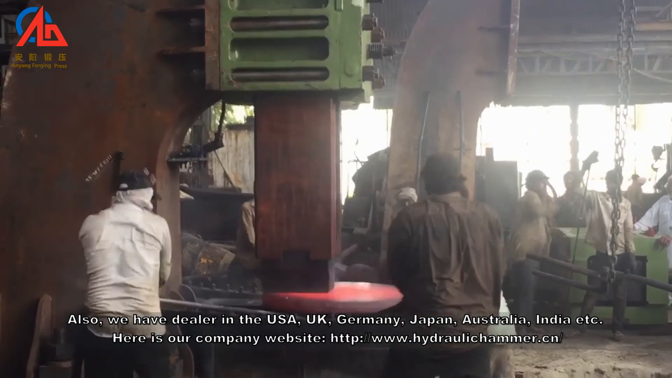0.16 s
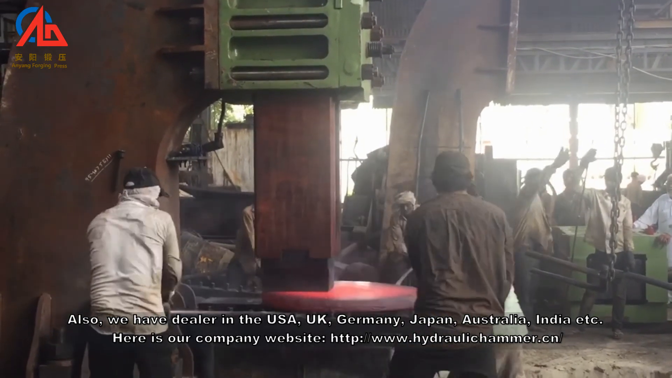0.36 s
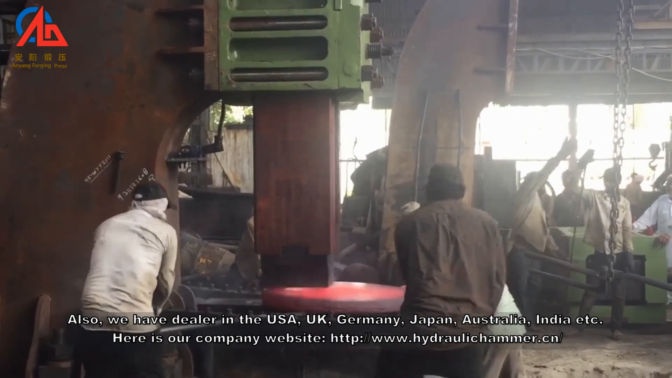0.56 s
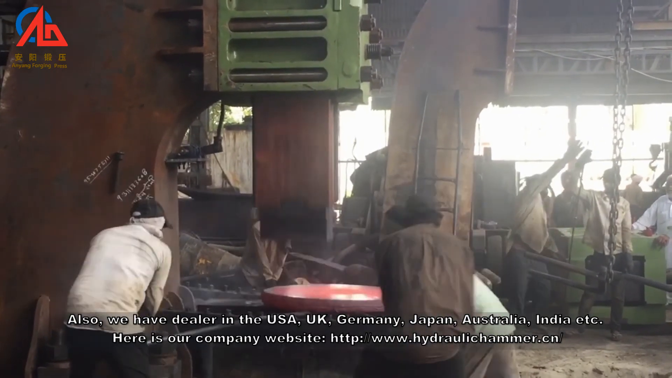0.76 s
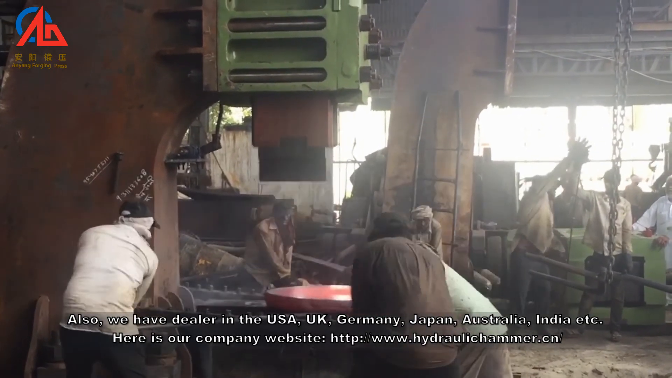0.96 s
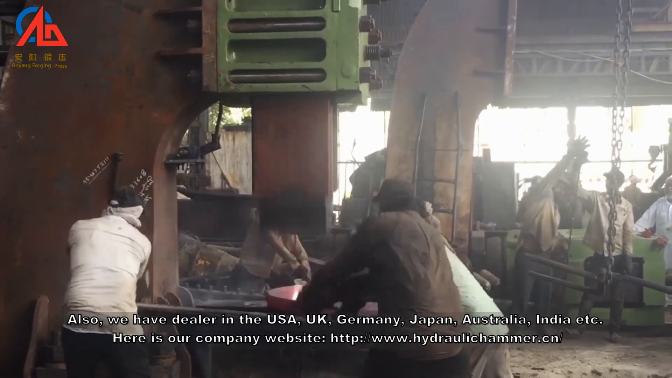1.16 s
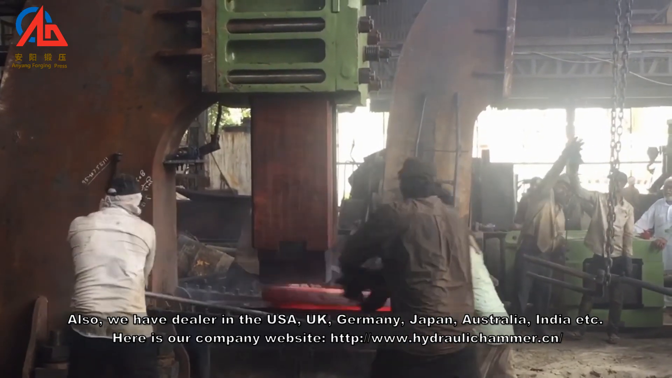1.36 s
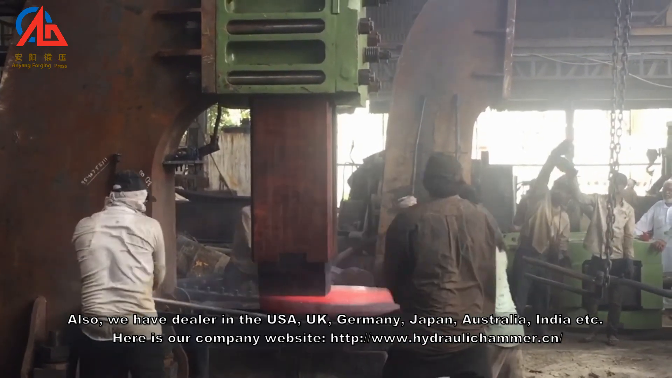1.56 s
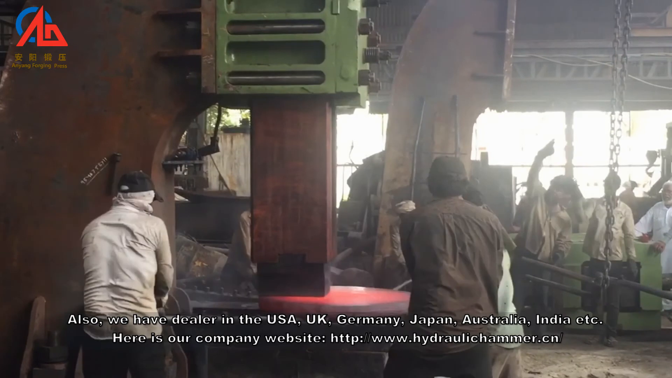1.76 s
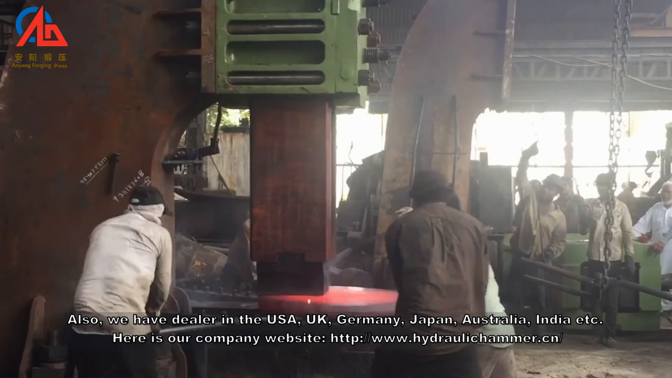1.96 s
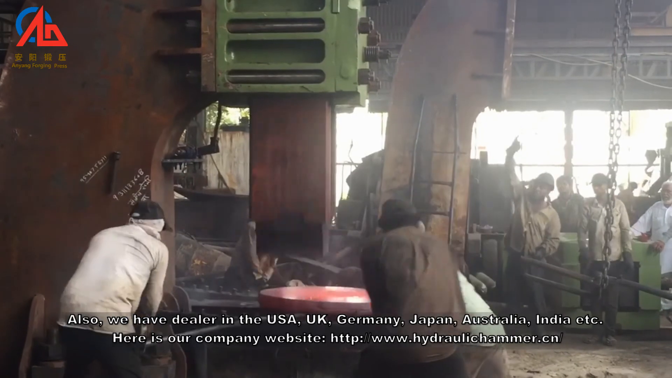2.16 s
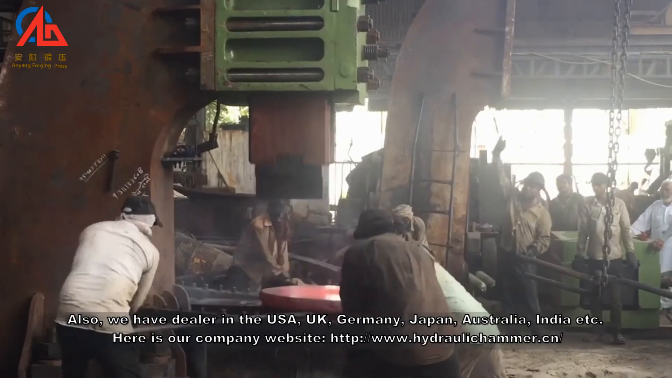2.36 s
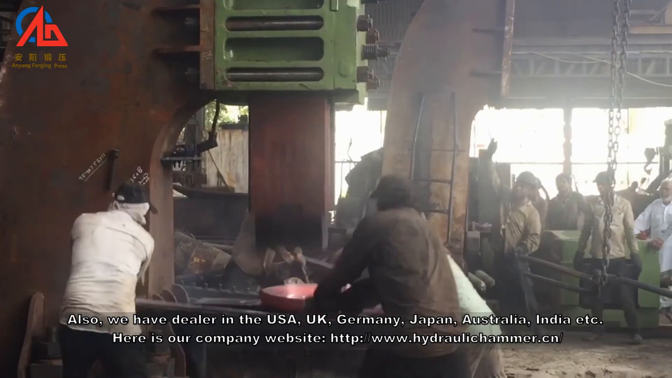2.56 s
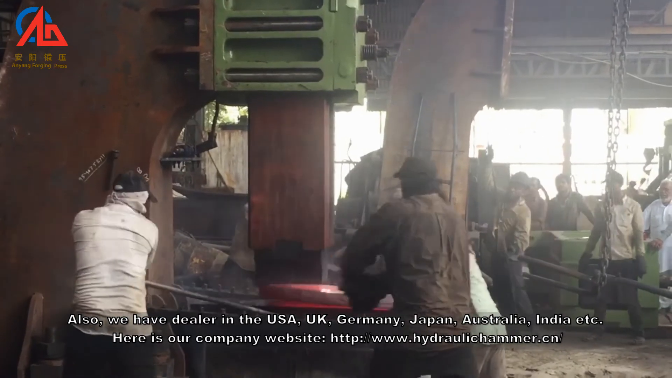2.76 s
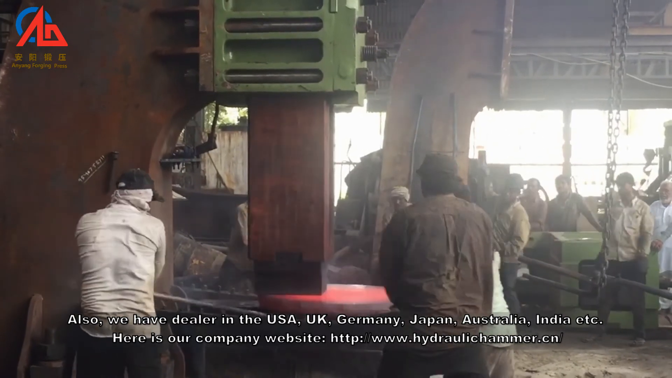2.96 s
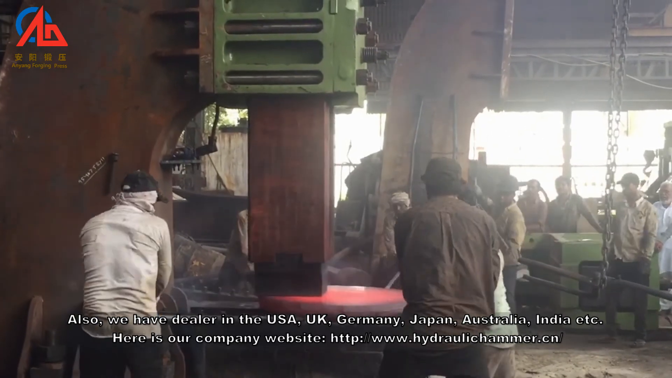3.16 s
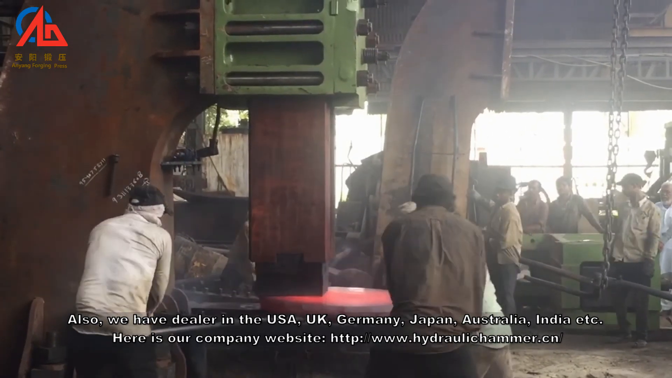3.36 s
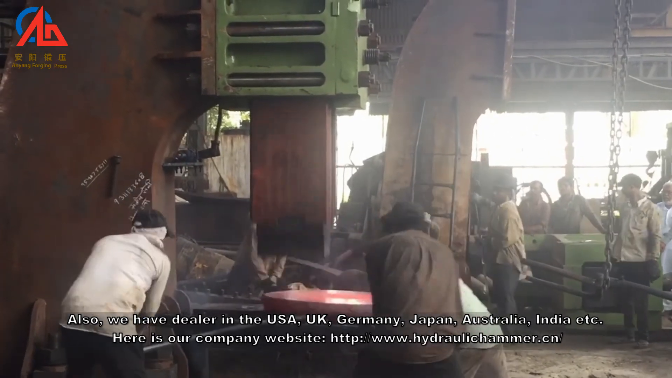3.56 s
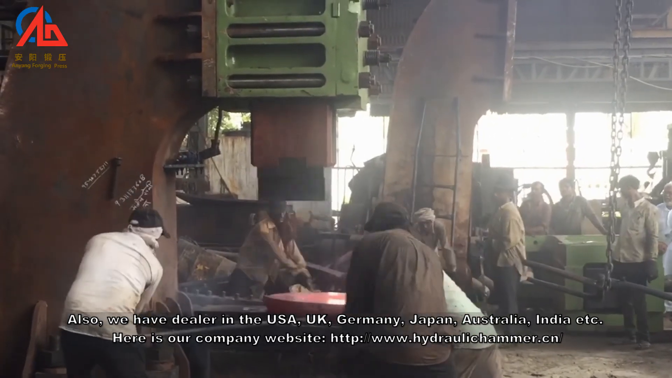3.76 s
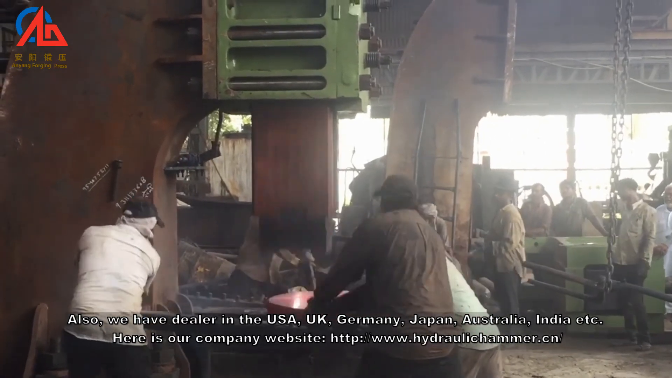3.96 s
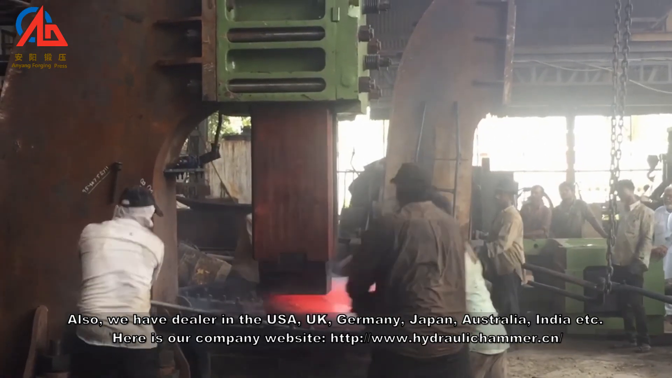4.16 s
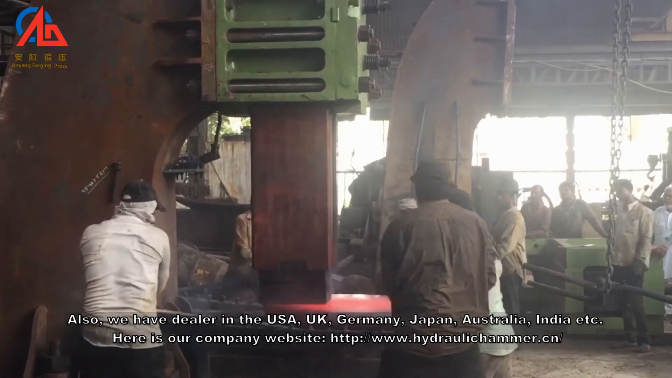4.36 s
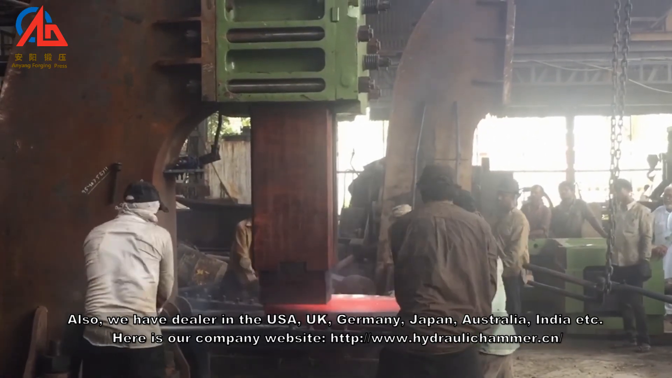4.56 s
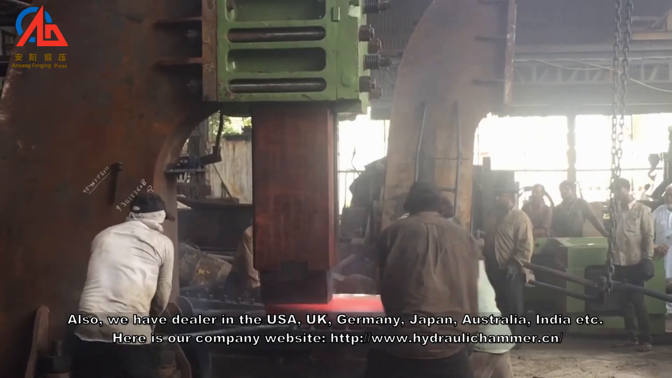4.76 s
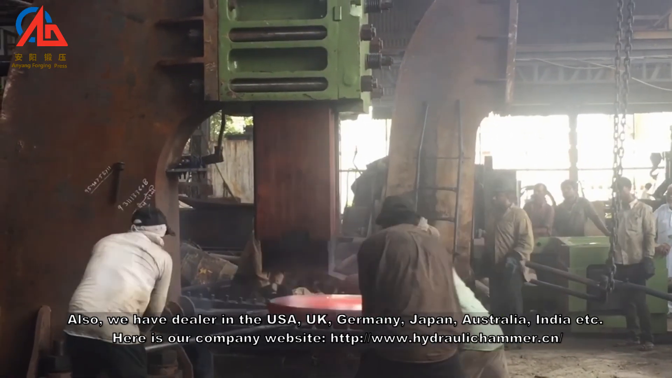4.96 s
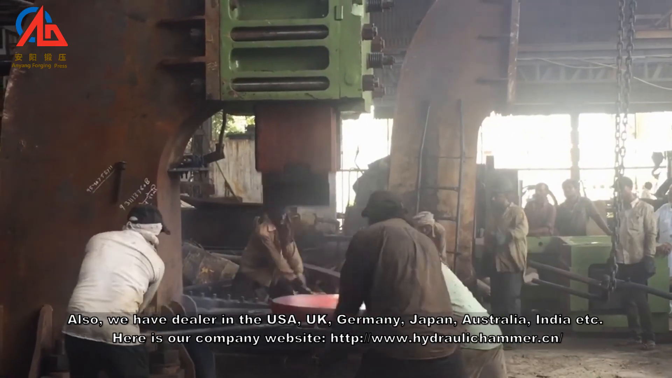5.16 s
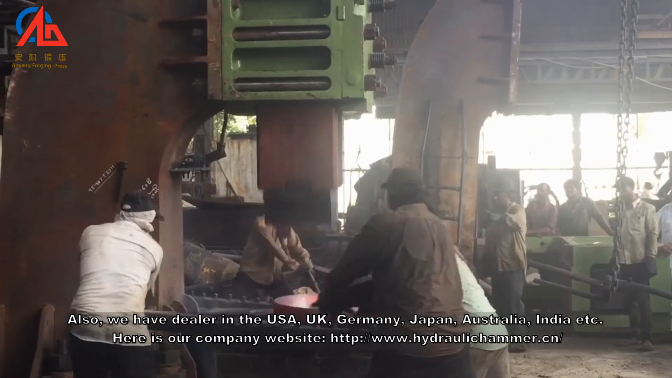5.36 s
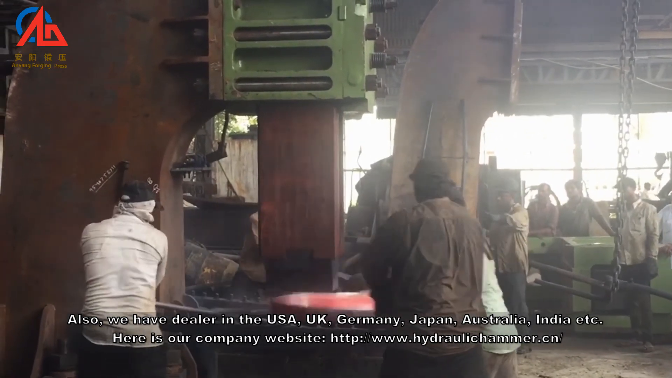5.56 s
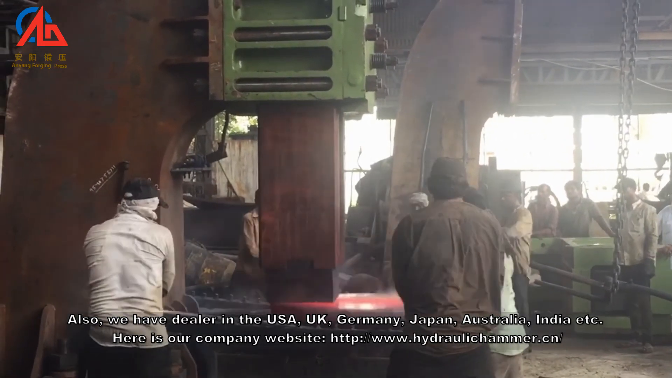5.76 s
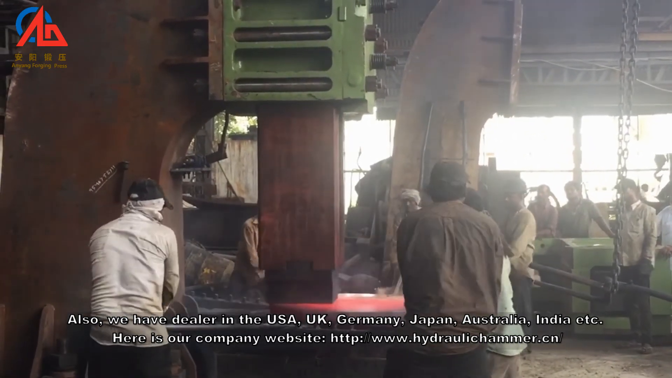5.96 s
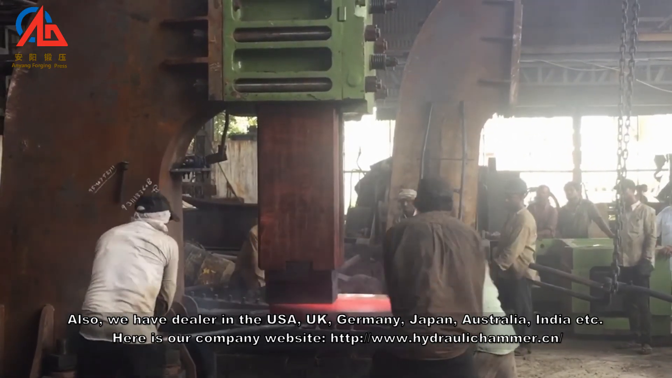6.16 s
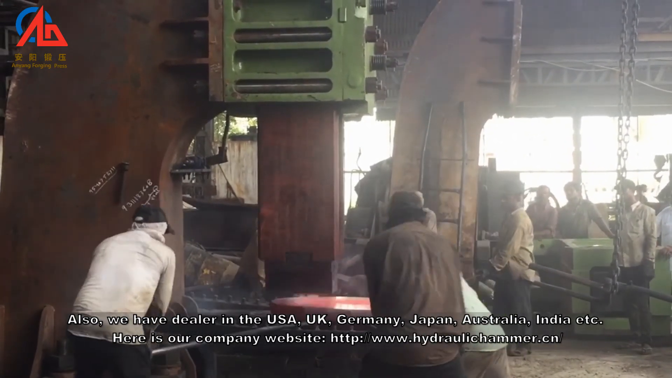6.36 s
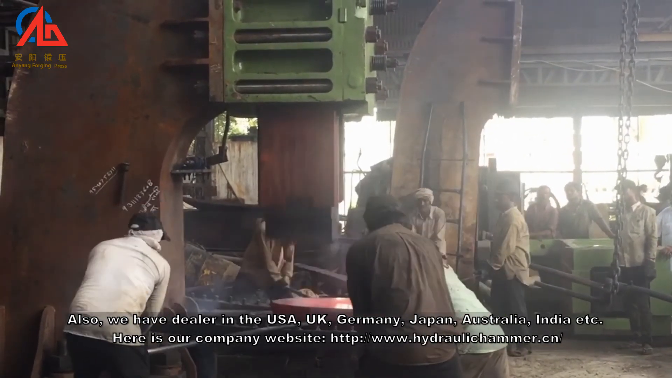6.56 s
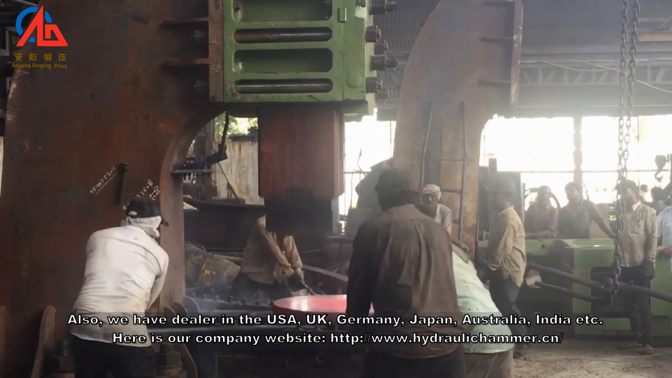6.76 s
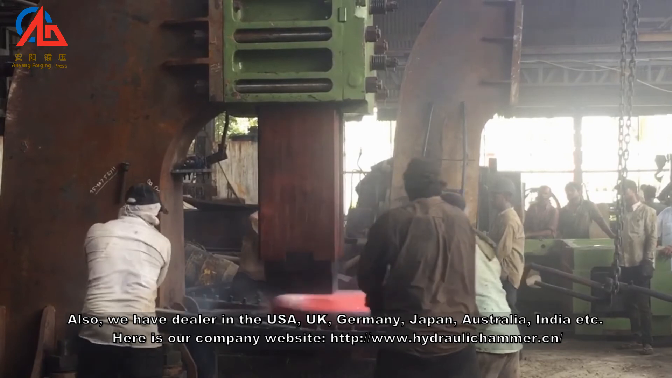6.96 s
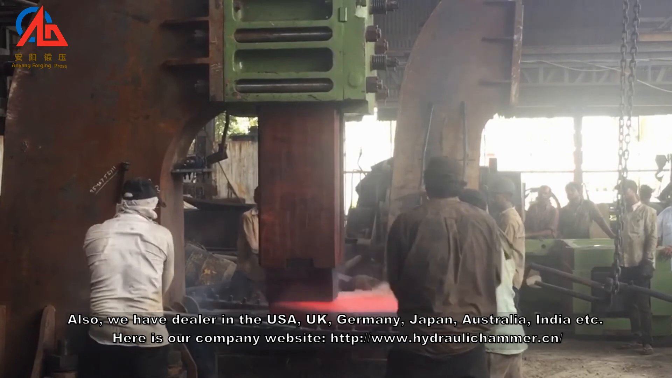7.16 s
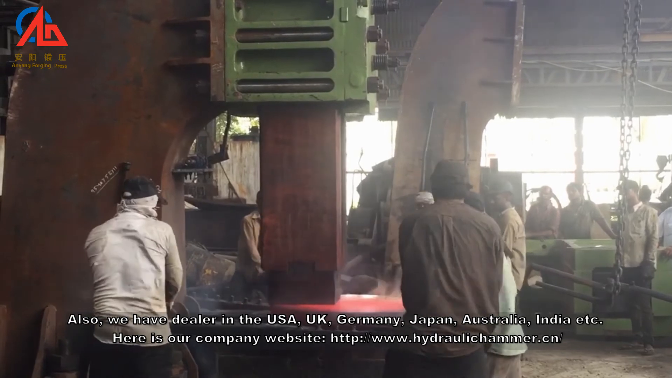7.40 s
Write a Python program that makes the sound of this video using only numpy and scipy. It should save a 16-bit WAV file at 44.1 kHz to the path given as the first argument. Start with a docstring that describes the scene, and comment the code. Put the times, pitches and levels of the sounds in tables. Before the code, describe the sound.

Six enormous metal blows at a steady slow pace, heard close up in a reverberant metalworking hall. Every impact cracks abruptly, slightly overloaded, with low thump and quickly choked steel ringing. The ram rebounds with a rattling knock a fifth of a second later. Low machine rumble and airy hiss then grow towards the next blow, joined by loose steel clanks, friction squeals and a very faint high whistle.

```python
"""First a crash already under way: a power hammer on hot steel, in a loud forge hall, close to a small microphone.
Six blows overload it: lumpy noise cracks, decaying modes thud and ring in ram and anvil, the hall answers behind,
and each rebound knocks and clatters. Between blows, shaped noise rumbles, roars and hisses as the drive lifts the
ram; guides squeal in narrow resonances, linkage clanks, and a thin whistle wanders at the top."""
import sys
import numpy as np
from scipy import signal
from scipy.fft import rfft, irfft
from scipy.io import wavfile
from scipy.ndimage import uniform_filter1d

SR = 44100
rng = np.random.default_rng(int(sys.argv[2]) if len(sys.argv) > 2 else 0)


def wav_record(signal):
    """Record a signal, one row per channel, as 16-bit PCM in the file named by sys.argv[1]."""
    frames = np.transpose(np.atleast_2d(signal))
    bounded = np.clip(frames, -1, 1)
    # unit amplitude maps onto the largest positive 16-bit level
    quanta = np.round(bounded * 32767).astype(np.int16)
    wavfile.write(sys.argv[1], SR, quanta)


N = 327663

# Hammer blows: start_s, crash_level_db, brightness_db_per_octave, relative_thud_db, relative_ring_db, choke_after_s
BLOWS = [(-.037, 3.5, 0.7, 3.5, -3, 0.17), (1.378, 0.5, 0.64, .6, -1, 0.15),
         (2.756, 0.5, 0.53, 2.5, 1, 0.12), (4.165, 1.2, -0.54, 1, -3.5, .11),
         (5.621, 2.5, 0.34, 3.5, -3, .13), (7.041, 1.3, 0.5, 1.5, 2, 0.1)]
# Crash of the blow, relative density before the brightness tilt: pitch_hz, density_db_per_hz
CRASH_SPECTRUM = [(18, -43), (30, -20), (65, -16), (108, 4.5), (237, 2), (341, -5.5), (656, -2),
                  (900, -7.5), (1600, -6.5), (2000, -9), (2600, -14.5), (4310, -12.5), (4910, -19.5),
                  (15500, -35.5)]
# Decay of the crash: pitch_hz, t60_s
CRASH_T60 = [(40, 0.65), (120, 0.33), (500, 0.43), (1500, 0.42), (4000, 0.25), (10000, 0.21)]
# Decay of the hall: pitch_hz, t60_s
HALL_T60 = [(60, 0.78), (300, 1.34), (1200, 1.3), (4000, 0.89), (12000, 0.59)]
# Foundation modes that thud: pitch_hz, relative_level_db, t60_s
THUD_MODES = [(90.6, 0.5, 0.45), (139, -4.5, 0.34), (209.2, -4, 0.38)]
# Ram and anvil modes: pitch_hz, relative_level_db, t60_s (before the half-second fade)
ANVIL_MODES = [(367, -16, 1), (540, -10, .3), (645, 0, .3), (705, -8, .5), (822, -12, .4), (1000, -11, .4),
               (1130, -12, .3), (1519, 3.5, .8), (1553, -11, .5), (1620, -10, .3), (1742, -9, .6),
               (1796, -7, .4), (2140, -14, .3), (3012, -17, .3), (3310, -17, .3), (3507, -17, .3),
               (3748, -17, .3), (3850, -18, .3), (3910, -18, .3), (4307, -18, .35)]
# A thin, slow-dying ring of the frame: pitch_hz, level_db, t60_s (before the half-second fade)
FRAME_RING = [(4470, -35.5, 4.2)]
# Ram rebounds: start_s, clatter_level_db, first_knock_level_db
REBOUNDS = [(.152, -20.5, -27), (1.570, -18, -20.5), (2.946, -18, -15.5), (4.357, -18, -20.5),
            (5.815, -18, -29), (7.245, -18, -29)]
# Clatter of the frame, relative density: pitch_hz, density_db_per_hz
CLATTER_SPECTRUM = [(24, -52), (40, -15), (101, 0.5), (485, -5), (577, -2.5), (1160, -11), (1530, -11),
                    (1650, -12), (4460, -28.5), (15500, -51.5)]
# First knock of the rebound, relative density: pitch_hz, density_db_per_hz
KNOCK_SPECTRUM = [(200, -30), (700, 8.5), (3000, -6), (5000, -11.5), (10000, -24), (15500, -32)]
# Strokes before blows two to six: ram_up_s, ram_driven_down_s, rumble_down_db, hiss_at_turn_db, hiss_at_blow_db
STROKES = [(0.575, 0.95, -24, -34, -24.5), (2.06, 2.486, -22.5, -28, -28.5), (3.365, 3.853, -24, -30, -23),
           (4.86, 5.276, -22.5, -28, -21), (6.22, 6.723, -22.5, -28.5, -24.5)]
# Low rumble of the drive, relative density: pitch_hz, density_db_per_hz
RUMBLE_SPECTRUM = [(15, -50), (25, -34), (65, -13.5), (134, -3), (239, -9.5), (281, -11), (314, -16),
                   (348, -10.5), (500, -27), (650, -31), (1100, -120)]
# Roar of the drive, relative density: pitch_hz, density_db_per_hz
ROAR_SPECTRUM = [(210, -52), (350, -5), (584, -1.5), (942, -7), (1060, -4.5), (1300, -9), (2600, -12),
                 (3380, -37), (5720, -120)]
# Hiss of the drive, relative density: pitch_hz, density_db_per_hz
HISS_SPECTRUM = [(1180, -0.5), (2000, -3.5), (2350, -6.5), (2840, -1), (3940, -7.5), (4440, -8.5),
                 (6050, -9.5), (7560, -14.5), (8230, -14), (10500, -19.5), (11400, -16), (13400, -22),
                 (15500, -23)]
# Linkage clanks: start_s, level_db (before a common 10.5 dB cut), pitch_hz (centre)
CLANKS = [(.579, -30, 4000), (1.212, -18, 3000), (1.233, -9, 1190), (2.487, -17, 1510), (2.492, -8.5, 170),
          (2.609, -18, 4000), (3.895, -13.5, 1500), (4.018, -16, 2190), (4.045, -10.5, 1150),
          (5.336, -19, 1690), (5.488, -8.5, 1150), (6.769, -21, 1600), (6.909, -17, 3500),
          (6.94, -11, 1200)]
# Frame tones woken by the sliding ram: pitch_hz, level_db (at the loudest hiss, before its flicker)
GUIDE_TONES = [(2745, -46), (3195, -44), (3435, -48), (4440, -46), (4942, -46), (6150, -49), (6632, -52),
               (8150, -46.5), (8300, -48), (8845, -53), (11460, -51)]
# Clear squeals: start_s, length_s, pitch_hz, level_db (before fades and flicker)
SQUEALS = [(.62, .22, 3140, -44), (2.285, .18, 2745, -33), (2.33, .34, 4942, -45), (2.3, .3, 4400, -45),
           (2.35, .14, 8200, -46), (3.4, .37, 2926, -37), (3.76, .26, 2926, -33), (3.62, .32, 2775, -40),
           (3.65, .3, 4377, -45), (3.42, .35, 6148, -40), (3.842, .19, 6148, -42), (3.952, .2, 11795, -51),
           (4.0, .15, 2745, -41), (5.101, .24, 2590, -40), (5.4, .19, 3200, -38), (6.2, .2, 3195, -44),
           (6.46, .26, 3192, -40), (6.7, .33, 3192, -39), (6.6, .15, 5281, -42), (6.88, .16, 2659, -38)]
# Course of the whistle: time_s, pitch_hz
WHISTLE_PITCH = [(0, 14750), (.55, 15080), (.82, 14480), (1.22, 15660), (1.6, 14100), (2.05, 14600),
                 (2.48, 13950), (2.8, 15000), (3.12, 15450), (3.4, 14900), (3.9, 14800), (4.12, 14740),
                 (4.35, 14800), (4.6, 14480), (4.85, 15100), (5.33, 15500), (5.6, 15050), (5.9, 14550),
                 (6.1, 14450), (6.3, 14000), (6.88, 14370), (7.0, 13800), (7.43, 13900)]
# Faint difference between the channels on the blows: pitch_hz, side_minus_mid_db
BLOW_SIDE = [(60, -34), (300, -51.5), (1000, -48), (3000, -19), (15000, -10)]
# Faint difference between the channels between blows: pitch_hz, side_minus_mid_db
MACHINE_SIDE = [(60, -32), (150, -58.5), (380, -38), (950, -43), (2380, -23), (5980, -17), (15000, -13.5)]

REBOUND_RING_DB, RATTLE_DB = -28, 1.14  # anvil rings again; rms level flicker of the clatter
DROP_S, STEP_S = .14, 0.062  # pressure falls after a blow; the valve switches
RUMBLE_REST_DB, ROAR_REST_DB, HISS_REST_DB = -32.5, -35.5, -38.5
RUMBLE_UP_DB, ROAR_UP_DB, HISS_UP_DB = -29, -32, -35.5
ROAR_UNDER_RUMBLE_DB = 3.5  # while the ram is driven down
CLANK_T60_S, CLANK_T60_SLOPE = 0.3, -.3  # at 1 kHz; higher clanks die sooner
WHISTLE_AT_REST_DB, WHISTLE_FOLLOWS = -59.5, 1  # dB gained for each dB of hiss
EDGE_HZ = 15660  # upper band limit


def hammer():
    """Steel on steel excites the same frame modes at every blow and rebound."""
    out = np.zeros(N)
    # hundreds of small upper modes, one value per Hz, make every crash lumpy in the same way
    lumps = rng.standard_normal(SR // 2 + 1)
    for _ in range(2):
        lumps = uniform_filter1d(lumps, size=16)
    modes_db = 3.0 * evened(lumps) * np.clip(np.arange(len(lumps)) / 3000, 0, 1)
    for settings in BLOWS:
        blow(out, modes_db, *settings)
    for settings in REBOUNDS:
        rebound(out, modes_db, *settings)
    return out


def blow(out, modes_db, s, crash_db, tilt_db, thud_db, ring_db, choke_s):
    """Impact noise, reflected by the hall, with the foundation and steel ringing at their own modes."""
    t = np.arange(SR // 2) / SR
    fade = np.cos(np.pi * t)  # reaches silence after half a second
    crash = burst(CRASH_SPECTRUM, CRASH_T60, tilt_db, rise=0.00041, low_rise=0.0063, hold=0.019, modes_db=modes_db)
    hall = burst(CRASH_SPECTRUM, HALL_T60, -0.77, rise=0.03, low_rise=.02, hold=.0, modes_db=modes_db)
    add(out, s, amp(crash_db) * (crash + amp(-16.0) * hall))
    thud = ring(THUD_MODES, t, rough=0.25) * (1 - np.exp(-t / 0.0068))
    add(out, s, amp(thud_db - 7) * thud * fade)
    add(out, s, ring(FRAME_RING, t, rough=.3) * fade)
    clang = ring(ANVIL_MODES, t, rough=.2) * (1 - np.exp(-t / 0.0018))
    # the steel rings freely until the dies shift and choke it
    damping_db = 9 * np.clip((t - choke_s) / 0.032, 0, 1)
    add(out, s, amp(ring_db - 7.0 - damping_db) * clang * fade)


def rebound(out, modes_db, s, clatter_db, knock_db):
    """The returning ram rings the anvil again, knocks, and sets the frame clattering in lumps."""
    t = np.arange(SR // 2) / SR
    add(out, s, amp(REBOUND_RING_DB) * ring(ANVIL_MODES, t, rough=0.42) * np.cos(np.pi * t))
    clatter = burst(CLATTER_SPECTRUM, HALL_T60, 0, rise=0.0012, low_rise=0.01, hold=0.12, modes_db=modes_db)
    add(out, s, amp(clatter_db + RATTLE_DB * wander(90)[:SR]) * clatter)
    knock_t60 = [(100, 0.12), (10000, 0.25)]  # pitch_hz, t60_s
    knock = burst(KNOCK_SPECTRUM, knock_t60, 0, rise=0.00025, low_rise=.004, hold=0.0032)
    add(out, s, amp(knock_db) * knock)


def drive():
    """Rumble, roar and hiss: noise in drifting patches, streaked by brief narrow rings of the frame."""
    rumble_db, roar_db, hiss_db = efforts()
    return (drive_noise(RUMBLE_SPECTRUM, rumble_db, patchy_db=2.0, streaky_db=1.5)
            + drive_noise(ROAR_SPECTRUM, roar_db, patchy_db=1.5, streaky_db=1.5)
            + drive_noise(HISS_SPECTRUM, hiss_db, patchy_db=1.5, streaky_db=3.0))


def drive_noise(spectrum, level_db, patchy_db, streaky_db):
    """Random short-time spectra: broad patches drift, narrow streaks last a little longer."""
    hz = np.fft.rfftfreq(2048, 1 / SR)
    real, imag, patches, streaks = rng.standard_normal((N // 512 + 5, len(hz), 4)).T
    patches = evened(smooth_grid(patches, bins=12, frames=8))
    streaks = evened(smooth_grid(streaks, bins=2, frames=14))
    peaks = np.clip(streaks, 0, 2) ** 2 / 2
    density_db = read(spectrum, hz)[:, None] + patchy_db * patches + streaky_db * peaks
    z = (real + 1j * imag) * amp(density_db)
    noise = signal.istft(z, nperseg=2048, noverlap=1536)[1][:N]
    return amp(level_db) * evened(noise)


def efforts():
    """Rumble, roar and hiss in dB: each stroke builds from rest through the lift to a surge on the way down."""
    rest = (RUMBLE_REST_DB, ROAR_REST_DB, HISS_REST_DB)
    lift = (RUMBLE_UP_DB, ROAR_UP_DB)
    rows = []
    for (up, down, rumble_db, turn_db, end_db), before, after in zip(STROKES, BLOWS, BLOWS[1:]):
        surge = (rumble_db, rumble_db - ROAR_UNDER_RUMBLE_DB)
        rows += [(before[0] + DROP_S, *rest),
                 (up - STEP_S, *lift, HISS_REST_DB),
                 (up, *lift, HISS_UP_DB),
                 (down - STEP_S, *lift, turn_db),
                 (down, *surge, turn_db),
                 (after[0], *surge, end_db)]
    rows.append((BLOWS[-1][0] + DROP_S, *rest))
    s, *levels_db = np.transpose(rows)
    return [np.interp(np.arange(N) / SR, s, db) for db in levels_db]


def clanks():
    """Loose steel parts knock: short, broad resonances of noise."""
    out, t = np.zeros(N), np.arange(SR // 2) / SR
    for s, db, hz in CLANKS:
        t60 = CLANK_T60_S * (hz / 1000) ** CLANK_T60_SLOPE
        knock = evened(resonate(rng.standard_normal(len(t)), hz, .5 * hz + 100))
        add(out, s, amp(db - 10.5 - 60 * t / t60) * knock * (1 - np.exp(-t / 0.00064)))
    return out


def squeals():
    """Friction sings in narrow frame resonances: at random with the hiss, and in a few clear squeals."""
    hiss_db = efforts()[-1]
    out = np.zeros(N)
    for hz, db in GUIDE_TONES:
        flicker_db = 6.0 * np.minimum(wander(9), 1.5)
        tone = evened(resonate(rng.standard_normal(N), hz, 21))
        out += amp(hiss_db - hiss_db.max() + db + flicker_db) * tone
    for s, length, hz, db in SQUEALS:
        rub = rng.standard_normal(round(length * SR))
        fuzz = evened(resonate(resonate(rub, hz, 27.8), hz, 30))
        tone = evened(0.27 * fuzz + np.sin(2 * np.pi * hz * np.arange(len(rub)) / SR))
        flicker_db = .8 * wander(24)[:len(rub)]
        add(out, s, amp(db + flicker_db) * tone * signal.windows.tukey(len(rub), .4))
    return out


def whistle():
    """A thin, slightly fuzzy wandering line, perhaps oil through a narrow gap; it swells with the hiss."""
    hz = np.interp(np.arange(N) / SR, *np.transpose(WHISTLE_PITCH))
    hz = uniform_filter1d(hz, size=5000)
    fuzz = evened(resonate(rng.standard_normal(N), hz, 40))
    line = np.sin(2 * np.pi * np.cumsum(hz) / SR) + 0.48 * fuzz
    db = WHISTLE_AT_REST_DB + WHISTLE_FOLLOWS * (efforts()[-1] - HISS_REST_DB)
    return amp(db + 2.5 * wander(15)) * line


def burst(spectrum, t60, tilt_db, rise, low_rise, hold, modes_db=0, count=SR):
    """Noise in bands: bass builds slower than treble, all holds a moment, then each band dies at its own speed."""
    hz, t = np.fft.rfftfreq(count, 1 / SR), np.arange(count) / SR
    density_db = read(spectrum, hz) + tilt_db * np.log2(hz / 1000 + 0.065) + modes_db
    z = rfft(rng.standard_normal(count)) * amp(density_db)
    z /= np.sqrt(np.mean(irfft(z) ** 2))
    centres = np.geomspace(60, 15000, 9)
    out = np.zeros(count)
    for k, c in enumerate(centres):
        # overlapping triangles on a log scale add up to one
        share = np.interp(np.log(hz + 1), np.log(centres), np.arange(len(centres)) == k)
        band = irfft(z * share, count)
        build = 1 - np.exp(-t / (rise + low_rise * centres[0] / c))
        out += band * build * amp(-60 * np.maximum(t - hold, 0) / read(t60, c))
    return out


def ring(modes, t, rough):
    """Each mode is a decaying line roughened by narrow noise: it wobbles faster the higher it lies."""
    out = np.zeros(len(t))
    for hz, db, t60 in modes:
        cluster = evened(resonate(rng.standard_normal(len(t)), hz, .006 * hz + 8))
        line = np.sin(2 * np.pi * (hz * t + rng.random())) + rough * cluster
        out += amp(db - 60 * t / t60) * line
    return out


def resonate(x, hz, width):
    """A resonance of gain 1, width in Hz: shifts hz down to zero, smooths, and shifts back."""
    turn = np.exp(2j * np.pi * np.cumsum(hz * np.ones(len(x))) / SR)
    r = np.exp(-np.pi * width / SR)
    return 2 * (turn * signal.lfilter([1 - r], [1, -r], x / turn)).real


def wander(per_s):
    """Slow random drift of rms 1: sines of random phase, weaker as they get faster, up to per_s in Hz."""
    t = np.arange(0, N / SR + 1, 1 / 200)
    x = np.zeros(len(t))
    for f in np.geomspace(per_s / 12, per_s, 16):
        x += np.sin(2 * np.pi * (f * t + rng.random())) / np.sqrt(f)
    return np.interp(np.arange(N) / SR, t, evened(x))


def smooth_grid(grid, bins, frames):
    """Averages neighbours across pitch, then across time."""
    return uniform_filter1d(uniform_filter1d(grid, size=bins, axis=0), size=frames, axis=1)


def amp(db):
    """Decibels to amplitude."""
    return 10 ** (np.asarray(db) / 20)


def evened(x):
    """Brings the rms to 1."""
    return x / np.sqrt(np.mean(x ** 2) + 1e-20)


def read(points, hz):
    """Reads a table of values over log pitch."""
    f, value = np.transpose(points)
    return np.interp(np.log(hz + 1), np.log(f + 1), value)


def add(mix, s, sound):
    """Lays a sound into the mix at s seconds, cut at both ends of the mix."""
    at = round(s * SR)
    part = mix[max(at, 0):max(at + len(sound), 0)]
    part += sound[max(-at, 0):][:len(part)]


def side_of(x, side_db):
    """A faint difference between the channels: a share of the sound, phases scattered, in opposite sign left
    and right."""
    hz, _, z = signal.stft(x, SR, nperseg=512)
    turn = np.exp(2j * np.pi * rng.random(z.T.shape).T)
    scattered = z * amp(read(side_db, hz))[:, None] * turn
    return signal.istft(scattered, SR, nperseg=512)[1][:N] * [[1], [-1]]


def scene():
    """Hammer and machine in the middle, each with its own faint difference between the channels."""
    blows = hammer()
    machine = drive() + clanks() + squeals() + whistle()
    return blows + machine + side_of(blows, BLOW_SIDE) + side_of(machine, MACHINE_SIDE)


def record(dry):
    """The close microphone's input stage overloads softly on the blows; then the band limit."""
    clipped = dry / (1 + abs(dry / 0.87) ** 4.5) ** (1 / 5.7)
    lowpass = signal.firwin(1023, EDGE_HZ, window=("kaiser", 9), fs=SR)
    return signal.oaconvolve(clipped, lowpass[None], "same")


dry = scene()
out = record(dry)
wav_record(out)
```